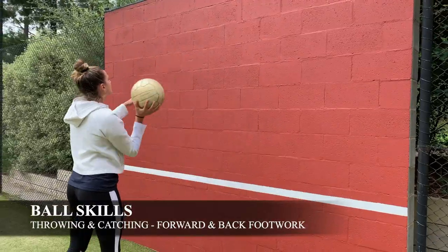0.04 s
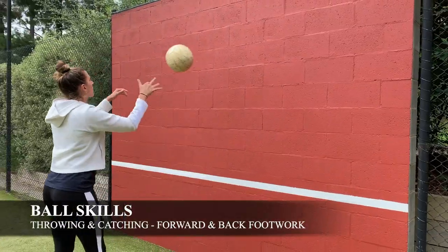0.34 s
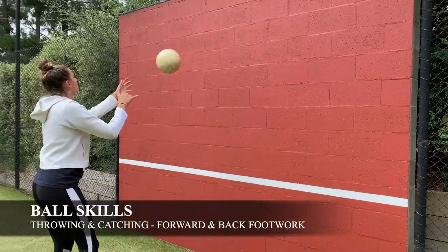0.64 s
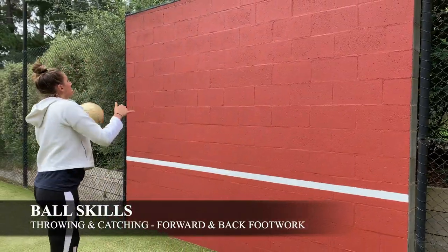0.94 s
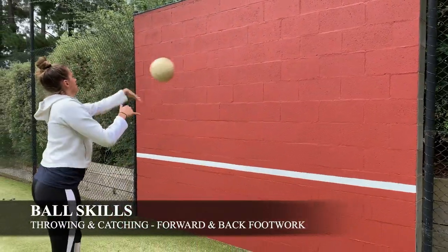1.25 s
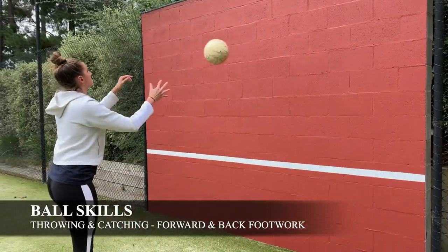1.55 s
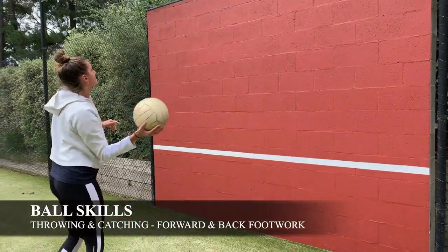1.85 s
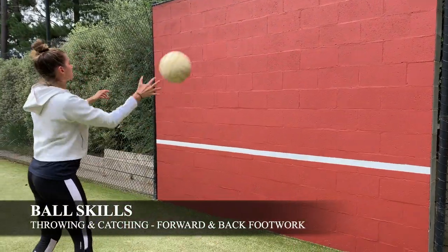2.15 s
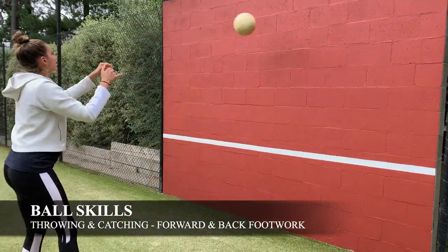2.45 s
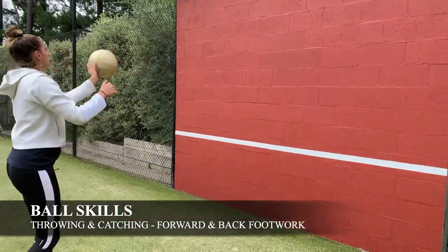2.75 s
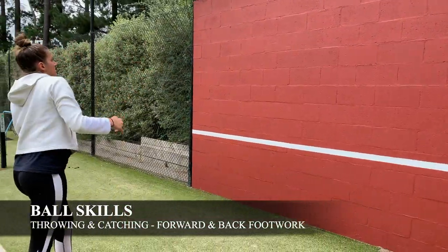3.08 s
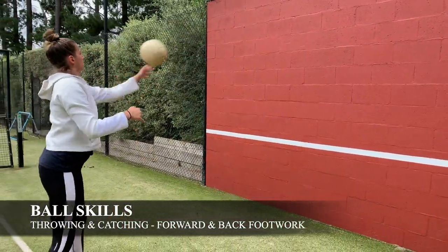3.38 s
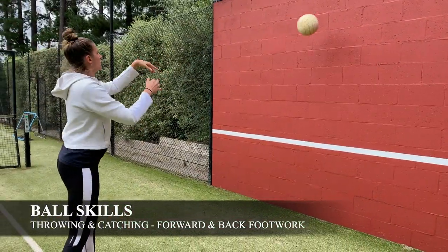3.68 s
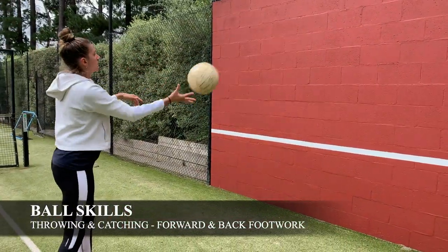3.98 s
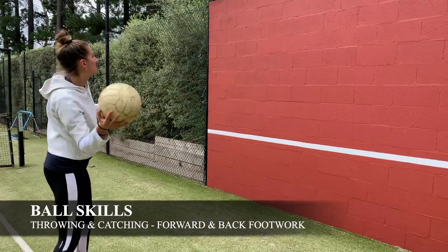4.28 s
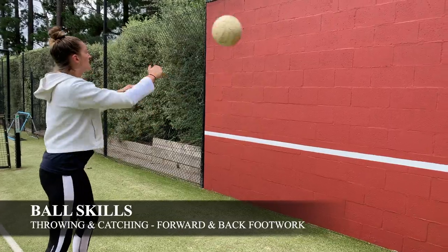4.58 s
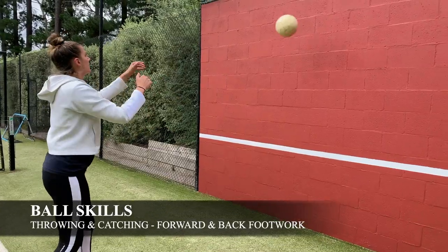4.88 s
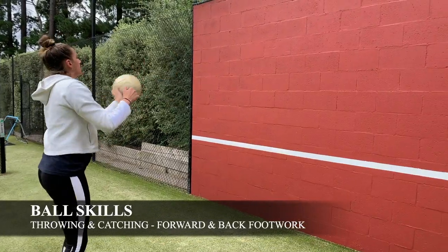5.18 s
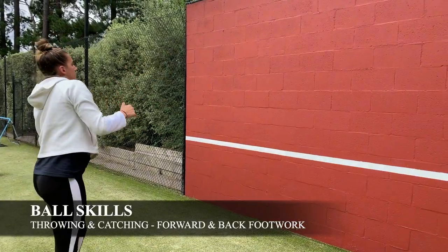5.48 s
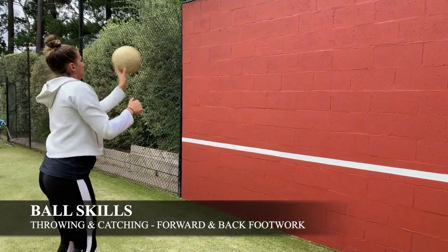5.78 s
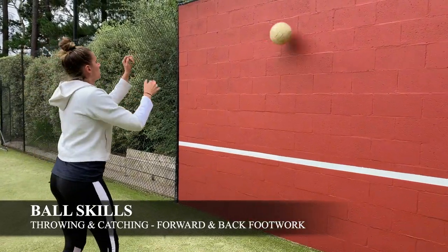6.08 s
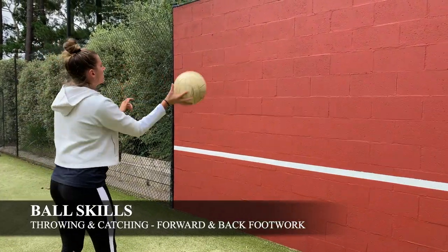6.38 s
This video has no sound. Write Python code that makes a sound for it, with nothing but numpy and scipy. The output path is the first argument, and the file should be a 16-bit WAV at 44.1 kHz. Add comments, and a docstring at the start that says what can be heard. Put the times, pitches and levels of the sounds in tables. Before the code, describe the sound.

A light breeze rumbles softly on the microphone as a ball smacks into a wall close by, thumping and echoing briefly around an outdoor court. It hits six times at a steady pace, the fourth the hardest. Soft catches follow the second to fifth hits, while gritty shoe scuffs, faint sleeve swishes and whispering leaves fill the gaps.

```python
"""On a fenced outdoor court of sanded turf, a light breeze stirs the trees and nudges the microphone.
A sleeve rustles as an arm lifts a netball and throws it one-handed at a block wall. The skin cracks,
trapped air slaps out and the squashed ball thumps; the ground and fences echo it and a thin hiss fades.
Shoes scuff, the arms reach for the rebound, and from the second throw on a soft catch may follow.
The ball hits the wall six times, about a second apart, and four catches are heard."""
import sys
import numpy as np
from scipy import signal
from scipy.fft import rfft, irfft, next_fast_len
from scipy.io import wavfile

SR = 44100
rng = np.random.default_rng(int(sys.argv[2]) if len(sys.argv) > 2 else 0)


def transcribe(signal):
    """Save signal, clipped to [-1, 1], as a 16-bit WAV file at the path in sys.argv[1]."""
    frames = np.atleast_2d(signal).T
    limited = np.clip(frames, -1, 1)
    pcm = np.round(limited * 32767).astype(np.int16)
    wavfile.write(sys.argv[1], SR, pcm)


N = 283563

# Each hit on the wall. A fade time (t60) is how long a sound takes to drop by 60 dB.
# (time [s], thump level [dB], thump pitch [ratio], slap level [dB], slap pitch [Hz], slap fade time [s],
#  crack level [dB], crack pitch [Hz], knock pitch [Hz], hiss level [dB])
THROWS = [(0.5527, -22.5, 1.09, -14, 1440, 0.0018, -24, 6650, 502, -81),
          (1.4557, -15.5, 1.04, -12, 2405, 0.0024, -20, 8200, 308, -75.5),
          (2.4435, -15, 1.006, -15.5, 1500, 0.013, -21, 4400, 590, -65),
          (3.7039, -12, 0.98, -8, 1736, 0.0019, -16, 5700, 478.4, -59),
          (4.888, -15, 1.012, -12, 1230, 0.0035, -30, 8500, 608, -66),
          (6.1356, -16, 1.038, -10, 2300, 0.0021, -19.5, 6500, 456, -66.5)]
CUTOFF_HZ = 16300   # top of the treble
AGE = np.arange(SR // 7) / SR   # seconds since a contact
SIZE = next_fast_len(N + SR)   # padded length for working with spectra
HZ = np.fft.rfftfreq(SIZE, 1 / SR) + 1e-6


def from_db(db):
    """Turn decibels into a factor to multiply by."""
    return 10 ** (np.asarray(db) / 20)


def rms_one(x):
    """Scale a signal to an average strength (rms) of 1."""
    return x / np.sqrt(np.mean(x ** 2) + 1e-20)


def at_hz(table, hz):
    """Read between the rows of a (frequency, value) table, with octaves evenly spaced."""
    table = np.array(table)
    return np.interp(np.log(hz), np.log(table[:, 0]), table[:, 1])


def band(x, low_hz, high_hz, order=2):
    """Keep the sound between two frequencies; a higher order cuts more sharply."""
    edges = np.clip([low_hz, high_hz], 10, .45 * SR)
    return signal.sosfilt(signal.butter(order, edges, "band", fs=SR, output="sos"), x + 1e-18)


def add(track, s, sound):
    """Mix a sound in from time s."""
    start = max(round(s * SR), 0)
    track[start:start + len(sound)] += sound[:len(track) - start]


def swell(peak_s):
    """A level that rises smoothly to 1 at peak_s and dies away."""
    return (AGE / peak_s * np.exp(1 - AGE / peak_s)) ** 2


def ring(hz, t60):
    """A pure tone that dies away."""
    return np.sin(2 * np.pi * hz * AGE) * from_db(-60 * AGE / t60)


def burst(low_hz, high_hz, peak_s):
    """A brief spray of tiny contacts."""
    contacts = rng.choice([-1, 1], len(AGE)) * swell(peak_s)
    return band(contacts, low_hz, high_hz, order=1) * np.sqrt(SR / 2 / (high_hz - low_hz))


def stereo_spectra(size):
    """Spectra of white noise at the microphone's two openings, less alike towards the treble."""
    # How alike left and right are: (frequency [Hz], likeness [0 to 1])
    likeness = [(30, 0.9), (150, 0.9), (500, 0.61), (1200, 0.13), (3000, 0.17), (16000, 0.094)]
    alike = np.clip(at_hz(likeness, np.fft.rfftfreq(size, 1 / SR) + 1e-6), 0, 1)
    mid, side = rfft(rng.standard_normal((2, size)))
    return np.sqrt((1 + alike) / 2) * mid + np.sqrt((1 - alike) / 2) * side * [[1], [-1]]


def shaped_noise(spectrum):
    """Steady stereo noise of strength 1, with the tone colour that a table gives."""
    return rms_one(irfft(stereo_spectra(SIZE) * from_db(at_hz(spectrum, HZ)), SIZE)[:, :N])


def reflections(x, table, build_s):
    """A sound's countless small reflections, which build up and die away band by band."""
    t, noise, response = np.arange(SR) / SR, stereo_spectra(SR), 0
    centres = np.log([row[0] for row in table])
    for (_, db, t60), this_band in zip(table, np.eye(len(table))):
        share = np.interp(np.log(np.arange(noise.shape[1]) + 1), centres, this_band)
        fade = from_db(-60 * np.minimum(t / t60, 10)) * (1 - np.exp(-t / build_s)) ** 2
        response = response + from_db(db) * irfft(noise * share, SR) * fade / np.linalg.norm(fade)
    return signal.fftconvolve(x[None], response, axes=1)[:, :N]


def breeze(air_db=-50.5, puff_hz=49.8, puff_rise_s=.012):
    """Steady outdoor air, with single puffs that each rock the microphone in the same way."""
    # Distant air and trees: (frequency [Hz], relative level [dB])
    air_colour = [(25, 0), (55, 1), (100, -3.5), (160, -13), (300, -16.5), (600, -18), (1000, -19.5),
                  (1600, -32.5), (3000, -36.5), (6000, -50), (10000, -52.5), (16000, -56.5)]
    # Puffs of air on the microphone: (time [s], level [dB])
    puffs = [(0.153, -34), (0.232, -27.5), (.878, -37.5), (1.203, -37), (2.939, -32), (3.362, -37),
             (4.245, -36.5), (4.389, -36.5)]
    rocking = np.zeros(N)
    for s, db in puffs:
        add(rocking, s, from_db(db) * swell(puff_rise_s) * np.sin(2 * np.pi * puff_hz * AGE))
    return rocking + from_db(air_db) * shaped_noise(air_colour)


def court(x, ground_echo, left_lag_samples=2, split_hz=1700, smear_hz=450):
    """The sound and its echoes arrive on the right first; scatter and a fading tail surround them."""
    # Echoes off the fences: (delay [s], level [dB], low edge [Hz], high edge [Hz])
    fence_echoes = [(0.0361, -22.5, 40, 147.6), (0.051, -21, 40, 170.3), (0.0512, -19, 3120, 7700),
                    (.109, -27.5, 49.6, 500)]
    # Scatter off nearby things: (frequency [Hz], level [dB], fade time [s])
    scatter_bands = [(49.5, -26.5, .1), (113.1, -29.5, .08), (250, -22, .05), (600, -14, 0.15),
                     (1199, -9, .05), (3040, -7, 0.043), (7020, -16, 0.065), (16000, -10.5, .06)]
    # The lingering tail of the court: (frequency [Hz], level [dB], fade time [s])
    tail_bands = [(50.2, -10, 1), (101.2, -13.5, .55), (188, -28.5, 0.15), (380, -29.5, 0.56),
                  (1003, -27.5, 0.42), (2500, -16.5, 0.52), (6000, -22.5, 0.31), (9960, -29.5, 0.32),
                  (15640, -30, .3)]
    early = x + ground_echo
    for lag, db, low_hz, high_hz in fence_echoes:
        add(early, lag, from_db(db) * band(x, low_hz, high_hz, order=1))
    scatter = reflections(x, scatter_bands, build_s=0.0039)
    tail = reflections(x, tail_bands, build_s=0.017)
    # the tail gathers sound sent out in all directions, so its treble blurs into a wash without pitch
    wander_hz = smear_hz * rms_one(band(rng.standard_normal(N), 40, 300))
    blur = np.sqrt(2) * np.cos(2 * np.pi * np.cumsum(wander_hz) / SR)
    tail = band(tail, 12, split_hz) + blur * band(tail, split_hz, CUTOFF_HZ)
    return np.array([np.roll(early, left_lag_samples), early]) + scatter + tail


def leaves_and_sleeves(leaves_db=-69, leaves_db_per_s=-0.59, flutter_db=2.0,
                       reach_lag_s=.2, reach_s=0.3, reach_db=-66):
    """Leaves whisper in the easing breeze; sleeves swish as arms lift the ball and reach for it."""
    # A sleeve as the arm lifts the ball: (middle time [s], length [s], level [dB])
    lifts = [(0.493, 0.47, -65), (1.223, 0.33, -65), (2.2, 0.58, -63), (3.07, .4, -65), (5.74, 0.57, -63)]
    reaches = [(throw[0] + reach_lag_s, reach_s, reach_db) for throw in THROWS]
    t = np.arange(N) / SR
    power = from_db(leaves_db + leaves_db_per_s * t) ** 2
    for s, length, db in lifts + reaches:
        arm_speed = np.cos(np.pi * np.clip((t - s) / length, -.5, .5))
        power = power + (from_db(db) * arm_speed) ** 2
    # The rustle of cloth and leaves: (frequency [Hz], relative level [dB])
    rustle_colour = [(150, -24), (500, 0), (1200, 7.5), (2500, -4.5), (5000, -13), (8000, -26),
                     (16000, -23)]
    flutter = rms_one(band(rng.standard_normal(N), 5.9, 40))
    return np.sqrt(power) * from_db(flutter_db * flutter) * shaped_noise(rustle_colour)


def ticks():
    """Faint dry ticks between the hits."""
    # Small ticks: (time [s], level [dB])
    small_ticks = [(2.416, -51), (4.2498, -62), (5.7863, -58)]
    out = np.zeros(N)
    for s, db in small_ticks:
        add(out, s, from_db(db) * burst(3000, 8100, 0.0007))
    return out


def shoe_scuffs(grain_db=1.5, pan_db=0.5):
    """A sole bites quickly and slides to rest, just left of centre; the sand grips unevenly."""
    # Shoes sliding on sanded turf: (time [s], length [s], scrape level [dB], sand hiss level [dB])
    slides = [(0.7, 0.26, -56.5, -75), (0.92, 0.074, -55.5, -64), (1.072, 0.1, -59.5, -56.5),
              (1.296, 0.087, -44.5, -56.5), (2.822, 0.086, -57, -59.5), (3.153, 0.17, -49, -83),
              (4.511, 0.035, -65, -82), (4.833, 0.11, -50.5, -62), (5.118, 0.1, -39.5, -48.5),
              (6.299, 0.078, -52.5, -60.5)]
    # The gritty scrape of the sole: (frequency [Hz], relative level [dB])
    sole_colour = [(150, -8.5), (400, -3.5), (650, 1.5), (1050, 1.5), (1600, -9), (3000, -21), (7000, -29),
                   (16000, -45)]
    # The hiss of the sand: (frequency [Hz], relative level [dB])
    sand_colour = [(500, -11), (1800, 6), (4000, -5.5), (7000, -11.5), (10000, -20.5), (16000, -16)]
    scrape_level, hiss_level = np.zeros(N), np.zeros(N)
    for s, length, scrape_db, hiss_db in slides:
        progress = np.linspace(0, 1, int(length * SR), endpoint=False)
        slide = np.sin(np.pi * progress ** 0.63) ** 1.37
        add(scrape_level, s, from_db(scrape_db) * slide)
        add(hiss_level, s, from_db(hiss_db) * slide)
    grip = from_db(grain_db * rms_one(band(rng.standard_normal(N), 33, 350)))
    scrape = scrape_level * shaped_noise(sole_colour) * from_db([[pan_db], [-pan_db]])
    return grip * (scrape + hiss_level * shaped_noise(sand_colour))


def catches(second_touch_s=.0042, padding_db=-5, clasp_s=0.017, clasp_db=-11):
    """The hand meets the ball and deadens it at once; then the other fingers close, more softly."""
    # The ball landing in a hand:
    # (time [s], thud level [dB], thud pitch [Hz], palm slap level [dB], finger tick level [dB])
    landings = [(1.776, -35.5, 206, -41.5, -49), (2.782, -36.5, 292, -56, -51.5),
                (4.0663, -29, 223, -40, -38.5), (5.215, -35.5, 293, -47.5, -49)]
    out = np.zeros(N)
    for s, thud_db, hz, palm_db, tick_db in landings:
        for lag, touch_db in ((0, 0), (clasp_s, clasp_db)):
            flex = swell(0.0058) * np.sin(2 * np.pi * hz * AGE)
            padding = from_db(padding_db) * band(burst(180, 390, 0.0092), 137, 890)
            palm = from_db(palm_db) * band(burst(540, 980, 0.0059), 150, 2200, order=1)
            click = burst(2000, 35000, 0.00046)
            fizz = from_db(-7.5) * band(burst(9900, 19600, 0.005), 8100, 19000)
            tick = from_db(tick_db) * (click + fizz)
            touch = palm + from_db(-14.0) * tick
            add(touch, second_touch_s, from_db(thud_db) * (flex + padding) + tick)
            add(out, s + lag, from_db(touch_db) * touch)
    return out


def after_hiss(peak_s=0.071, low_hz=2630, high_hz=5800):
    """A thin hiss swells and fades after each wall hit, strongest after the hardest one."""
    level, progress = np.zeros(N), np.arange(SR) / SR / peak_s
    for s, *_, hiss_db in THROWS:
        add(level, s, from_db(hiss_db) * (progress * np.exp(1 - progress)) ** 2)
    return level * rms_one(band(rng.standard_normal((2, N)), low_hz, high_hz))


def wall_hits(graze_db=-2, crack_width=1.83, snap_db=14, snap_cycles=4,
              slap_lag_s=0.00037, buckle_db=-20, crumple_db=-21,
              knock_db=-11.5, knock_follows=0.7, knock_t60=0.041, ground_db=-9.0, ground_lag_s=.0039):
    """The skin cracks on the wall, trapped air slaps out, the ball flexes and rings; the turf echoes."""
    # Flexing of the squashed ball: (pitch [Hz], level [dB], time to full swing [s], direction [+1 or -1])
    flexes = [(95.8, -3, 0.011, 1), (160.9, 1.5, 0.0087, 1), (259.3, -9.5, 0.0089, -1),
              (382, -21, 0.012, -1)]
    # Air ringing inside the ball: (pitch [Hz], level [dB], fade time [s])
    air_notes = [(1074, -25.5, 0.065), (1271, -29.5, 0.054), (1530, -29.5, 0.047), (2273, -38, 0.092),
                 (3000, -42, 0.16)]
    direct, ground_echo = np.zeros(N), np.zeros(N)
    for s, thump_db, pitch, slap_db, slap_hz, slap_t60, crack_db, crack_hz, knock_hz, _ in THROWS:
        thump = sum(np.sign(way) * from_db(db) * swell(peak_s) * np.sin(2 * np.pi * hz * pitch * AGE)
                    for hz, db, peak_s, way in flexes)
        # the panel that lands has a note of its own, louder with a louder thump
        knock = -from_db(knock_db + knock_follows * thump_db) * ring(knock_hz, knock_t60)
        inner_air = sum(from_db(db + rng.normal(0, 1.1)) * ring(hz, t60) for hz, db, t60 in air_notes)
        # the flattening patch keeps buckling, ever lower, while it spreads
        buckle = from_db(buckle_db) * burst(1200, 2900, 0.0022)
        crumple = from_db(crumple_db) * band(burst(372, 830, 0.007), 280, 1200)
        slap = ring(slap_hz, slap_t60) + buckle + crumple
        # the skin grazes the grain of the wall first, then snaps flat
        graze = burst(crack_hz / crack_width, crack_hz * crack_width, 0.00042)
        snap = from_db(crack_db + snap_db) * ring(crack_hz, snap_cycles / crack_hz)
        hit = from_db(thump_db) * thump + knock + from_db(crack_db + graze_db) * graze
        add(hit, slap_lag_s, from_db(slap_db) * (slap + inner_air) + snap)
        add(direct, s, hit)
        dulled_by_turf = band(hit, 8.1, 10000, order=1)
        add(ground_echo, s + ground_lag_s, from_db(ground_db) * dulled_by_turf)
    return direct, ground_echo


def scene():
    """Ball, hands and feet in the court, over the outdoor air."""
    hits, ground_echo = wall_hits()
    play = court(hits + catches() + ticks(), ground_echo)
    return play + shoe_scuffs() + leaves_and_sleeves() + breeze() + after_hiss()


def record(dry, left_db=2.0, right_db=1.3, left_lift_db=-10, right_lift_db=-6,
           shared_hz=7600, left_lag_s=.00026):
    """The microphone lifts the middle on the left and the lower treble on the right."""
    left = dry[0] + from_db(left_lift_db) * band(dry[0], 810, 2600, order=1)
    right = dry[1] + from_db(right_lift_db) * band(dry[1], 3570, 6800, order=1)
    left = rfft(from_db(left_db) * left, SIZE)
    right = rfft(from_db(right_db) * right, SIZE)
    # above shared_hz the left side carries the right side's sound, slightly late
    shared = 1 / (1 + (shared_hz / np.maximum(HZ, 20)) ** 20)
    delay = np.exp(-2j * np.pi * HZ * left_lag_s)
    left = np.sqrt(1 - shared) * left + np.sqrt(shared) * delay * right
    stereo = irfft(np.array([left, right]), SIZE)[:, :N]
    treble_cut = signal.ellip(10, .3, 80, CUTOFF_HZ, fs=SR, output="sos")
    return signal.sosfilt(treble_cut, stereo)


dry = scene()
out = record(dry)
transcribe(out)
```